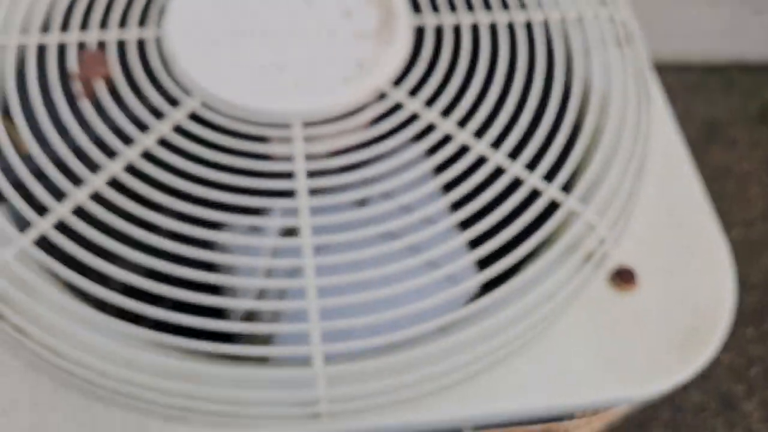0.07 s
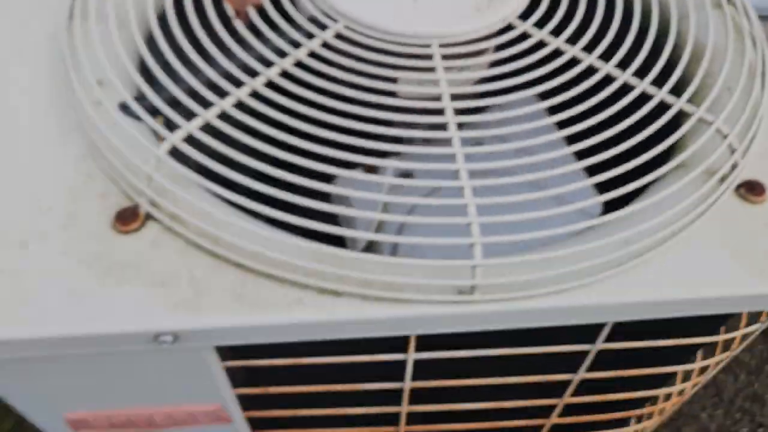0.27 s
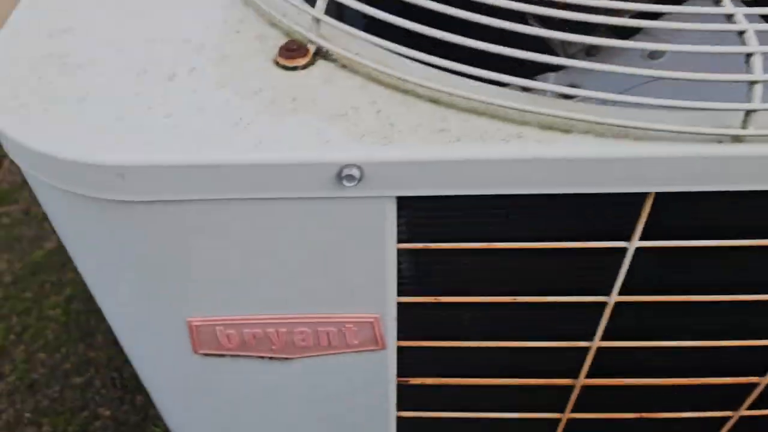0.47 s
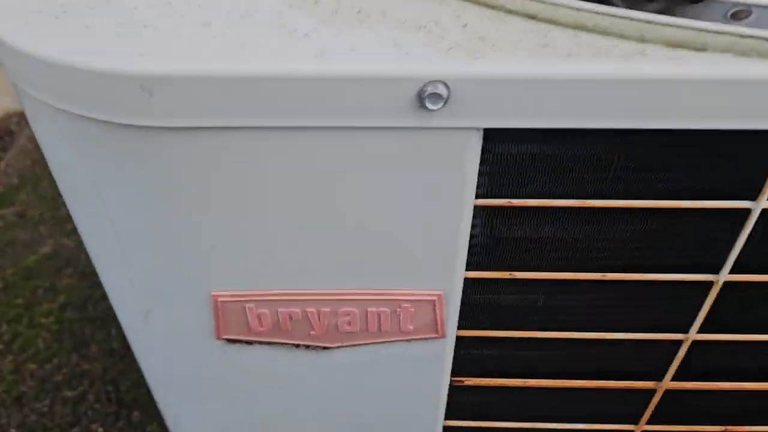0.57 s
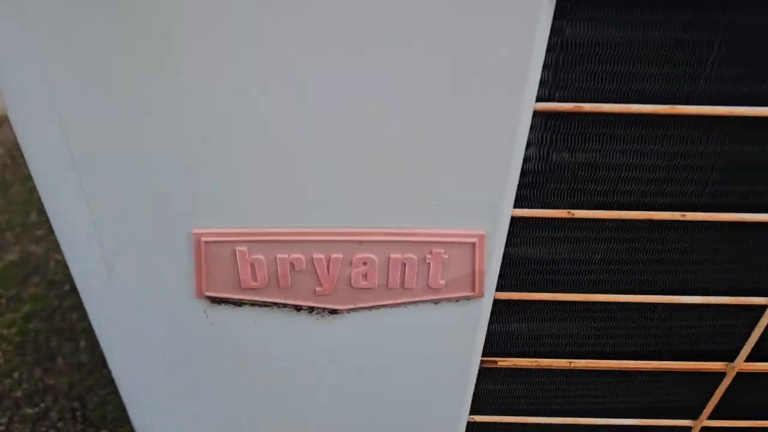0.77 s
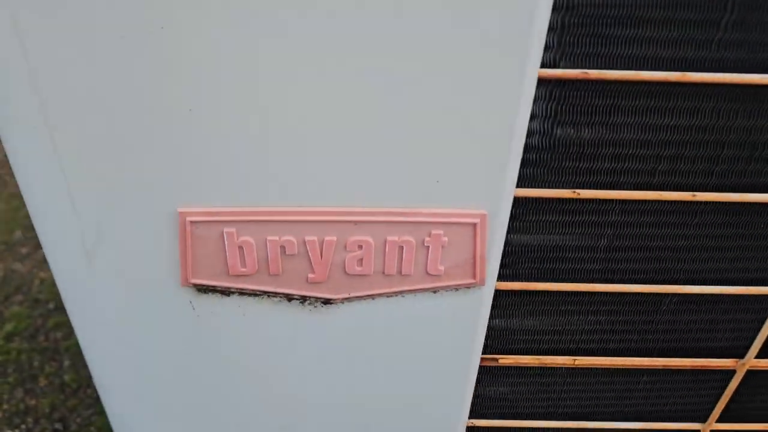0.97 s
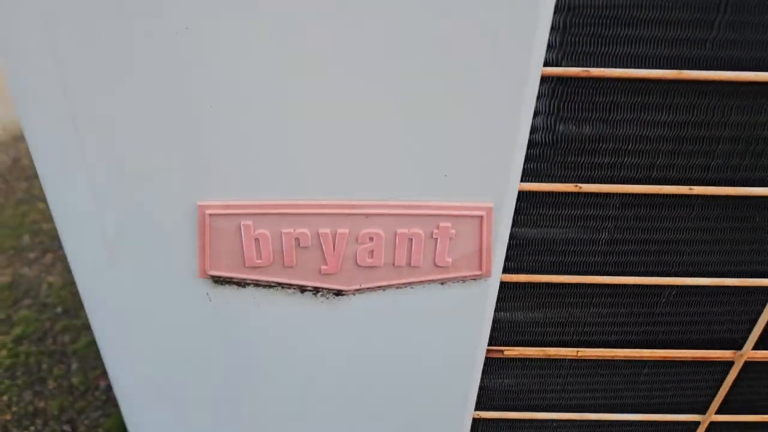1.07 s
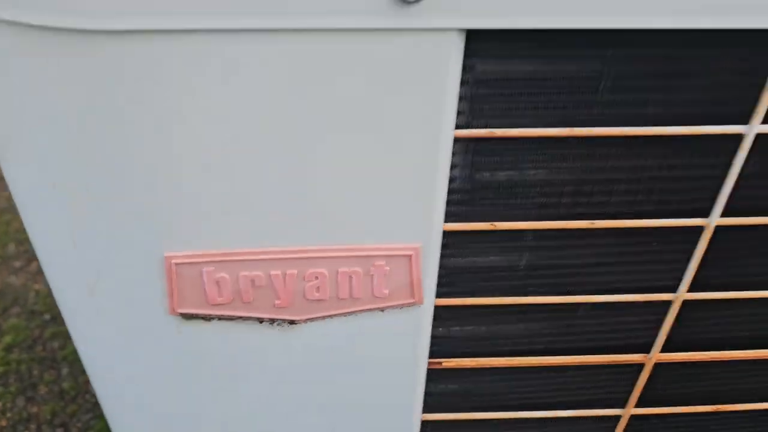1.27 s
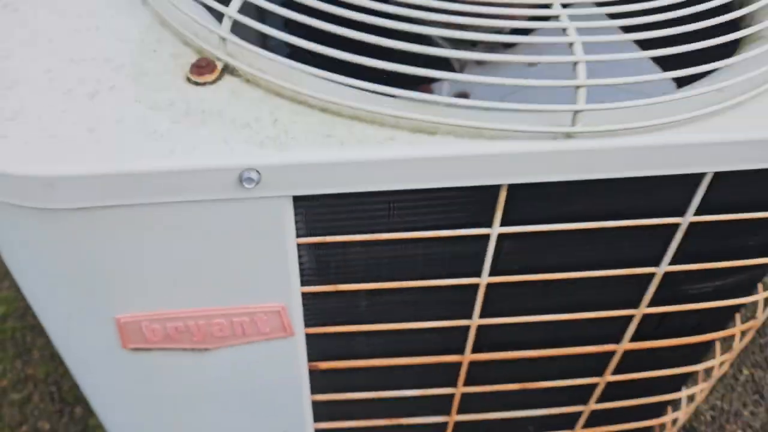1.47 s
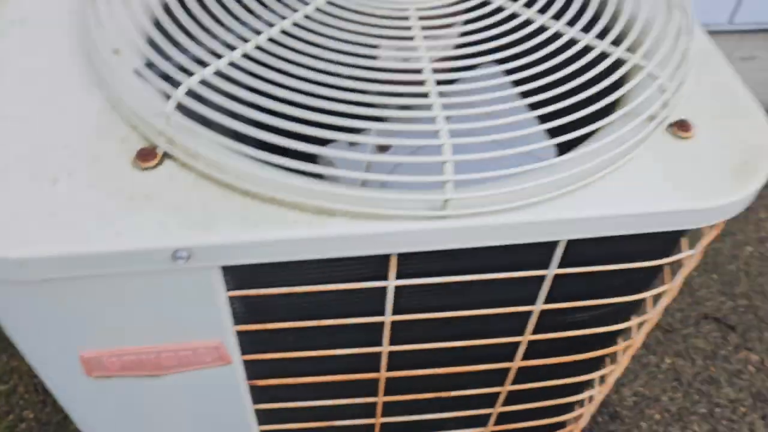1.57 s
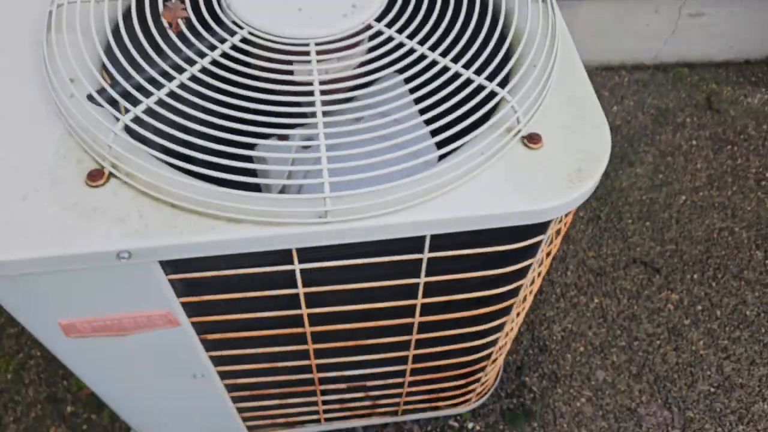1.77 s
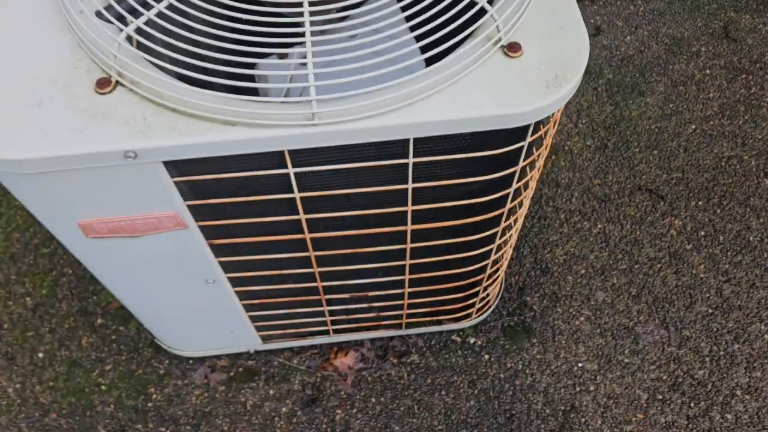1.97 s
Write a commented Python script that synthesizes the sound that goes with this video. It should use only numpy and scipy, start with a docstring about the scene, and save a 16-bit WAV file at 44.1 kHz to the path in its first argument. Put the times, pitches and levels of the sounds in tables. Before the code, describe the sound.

Low, faintly humming rumble of an outdoor cooling unit, with gravel scuffs, a stone knock and cloth rustle.

```python
"""Shuffling on gravel beside an air conditioner

An outdoor unit makes a low, even rumble with a faint hum: filtered noise and wavering sine tones.
Feet shift on gritty gravel: soles scuff (bursts of tiny clicks), stones click and knock (ringing tones).
A sleeve rustles and swishes on the right (filtered noise), and the hand-held microphone takes soft bumps.
"""
import sys
import numpy as np
from scipy import signal
from scipy.fft import rfft, irfft
from scipy.io import wavfile
from scipy.ndimage import uniform_filter1d, map_coordinates

SR = 44100
rng = np.random.default_rng(int(sys.argv[2]) if len(sys.argv) > 2 else 0)


def store_wav(level_fs):
    """Save 16-bit WAV to argv[1]."""
    pcm = np.round(np.clip(np.atleast_2d(level_fs), -1, 1) * 32767)
    wavfile.write(sys.argv[1], SR, pcm.T.astype(np.int16))


N = 88464  # length in samples


def undb(db):
    """Turn decibels into a gain."""
    return 10 ** (np.asarray(db) / 20)


def unit(x):
    """Scale a sound to an average (rms) strength of 1."""
    return x / np.sqrt(np.mean(x ** 2) + 1e-30)


def pan(db):
    """Give the left and right gains for a left-minus-right difference in dB."""
    gains = undb(np.array([[db], [-db]]) / 2)
    return unit(gains)


def frequencies():
    """List the frequency in Hz of each step of a spectrum."""
    return np.arange(N // 2 + 1) * SR / N


def colour(x, points):
    """Filter a sound along a curve of (Hz, dB) points, falling away below the first point."""
    hz, db = np.array(points, float).T
    f = np.maximum(frequencies(), 1)
    gain = undb(np.interp(np.log(f), np.log(hz), db))
    low_cut = np.minimum(f / hz[0], 1) ** 2
    return irfft(rfft(x) * gain * low_cut, N)


def tilted(points, db_per_octave):
    """Make a brighter or duller version of a spectrum."""
    return [(hz, db + db_per_octave * np.log2(hz)) for hz, db in points]


def walk(rate):
    """Wander smoothly at random, with a spread near 1 and `rate` new values per second."""
    hold = int(SR / rate)
    steps = np.repeat(rng.standard_normal(N // hold + 1), hold)
    smooth = uniform_filter1d(uniform_filter1d(steps, hold), hold)
    return unit(smooth[:N])


def since(start):
    """Count the seconds since a moment (negative before it)."""
    return np.arange(N) / SR - start


def swell(peak, attack, release):
    """Rise exponentially to a peak and fall away from it; all times in seconds."""
    t = since(peak)
    return np.exp(np.minimum(t / abs(attack), -t / abs(release)))


def ring(t, t60):
    """Start at t = 0 and die away by 60 dB in t60 seconds."""
    return (t >= 0) * np.exp(-np.log(1000) * np.maximum(t, 0) / t60)


def crackle(rate, spread_db, hiss, shared):
    """Mix dense tiny clicks of uneven strength with hiss, partly shared by both ears."""
    happens = rng.random((3, N)) < rate / SR
    sign = rng.choice([-1, 1], (3, N))
    strength = undb(spread_db * np.minimum(rng.exponential(size=(3, N)), 5))
    x = unit(happens * sign * strength) + hiss * rng.standard_normal((3, N))
    shared = np.clip(shared, 0, 1)
    return np.sqrt(1 - shared) * x[:2] + np.sqrt(shared) * x[2]


def strike(modes, s, db, side, tilt=0):
    """Hit a stone once: its natural tones (modes) start together and each dies away at its own pace."""
    t = since(s)
    body = 0
    for hz, gain_db, t60 in modes:
        tone = np.sin(2 * np.pi * hz * t) * ring(t, t60)
        body = body + tone * undb(gain_db) * undb(tilt * np.log2(hz))
    contact_s = .00025  # softens the very start of the blow
    body = body * (1 - np.exp(-np.maximum(t, 0) / contact_s))
    return body / np.abs(body).max() * undb(db) * pan(side)


def machine():
    """The unit: noise for the rumble, drone and air buffeting the microphone, sine tones for the hum."""
    # Spectra of the noises. Each row: frequency in Hz, relative level in dB.
    rumble_spectrum = [(28, -4), (55, -2), (72, 1), (110, -1.5), (150, -7), (200, -7.5), (245, -12),
                       (290, -11.5), (370, -19.5), (480, -19), (680, -20.5), (950, -26), (1300, -31.5),
                       (3000, -50), (4200, -72), (12000, -100)]
    drone_spectrum = [(120, -23.5), (210, -8), (255, 11.5), (300, -4), (340, 2.5), (420, -7), (590, -5),
                      (760, -23), (1500, -29), (4000, -61), (12000, -90)]
    buffet_spectrum = [(22, -2.5), (45, 3.5), (70, -15.5), (120, -8), (250, -30.5), (600, -72),
                       (3000, -100)]
    # How much the ears differ. Each row: frequency in Hz, side minus mid level in dB.
    ear_difference = [(20, -7), (120, -6), (300, -10), (800, -6), (2500, -2)]
    # The drone swells as the microphone moves. Each row: time in seconds, level in dB.
    drone_level = [(0, -53), (.4, -58.5), (0.702, -55), (1.05, -74), (1.22, -53), (1.36, -56.5),
                   (1.55, -48), (1.7, -55), (2.0, -65)]
    # Deep buffeting on the moving microphone. Each row: time in seconds, level in dB.
    buffet_level = [(0, -58), (.1, -47.5), (.25, -58), (.4, -46), (.52, -45.5), (.68, -48), (.85, -68),
                    (1.25, -66), (1.47, -43), (1.7, -65), (1.95, -47.5)]
    # Wavering tones of the hum. Each row: middle frequency in Hz, middle level in dB.
    hum_tones = [(70, -57), (241, -67.5), (263, -76), (465, -72)]

    def wide(points):
        """Noise with a part common to both ears and a part opposite in each."""
        mid, side = colour(rng.standard_normal((2, N)), points)
        side = colour(side, ear_difference)
        return unit(mid + side * np.array([[1], [-1]]))

    def level(curve):
        """Gain that follows the points of a level curve."""
        return undb(np.interp(since(0), *np.array(curve).T))

    rumble_db, waver_db = -49.5, 2
    rumble = wide(rumble_spectrum) * undb(rumble_db + waver_db * walk(5.62))

    left, right = wide(drone_spectrum) * level(drone_level)
    lag_s = 0.00043  # the drone reaches the right ear first
    drone = np.array([np.roll(left, int(lag_s * SR)), right])

    buffet = wide(buffet_spectrum) * level(buffet_level)

    pitch_waver, flutter_db = .015, 2  # pitch as a fraction of the frequency
    hum = 0
    for hz, db in hum_tones:
        gain = undb(db + flutter_db * walk(5.8))
        cycles = np.cumsum(hz * (1 + pitch_waver * walk(12))) / SR + rng.random()
        hum = hum + gain * unit(np.sin(2 * np.pi * cycles))
    return (rumble + drone + buffet + hum) * pan(-0.6)


def air():
    """Faint outdoor hiss: random noise with a shaped spectrum."""
    # Spectrum of the hiss. Each row: frequency in Hz, relative level in dB.
    air_spectrum = [(1500, 37), (3000, 19.5), (6000, 22), (9000, 11.5), (11000, -48), (16000, -48)]
    hiss = unit(colour(rng.standard_normal((2, N)), air_spectrum))
    return hiss * undb(-77) * pan(db=-8)


def swish():
    """Thin, whistling fabric: bands of friction noise waver and creep upward as it slides faster."""
    # Resonances of the fabric. Each row: frequency in Hz, width in Hz, relative level in dB.
    swish_modes = [(2300, 900, -9), (3256, 430, 0), (4680, 380, -11.5), (6950, 3300, -31)]
    peak_s, attack_s, release_s, level_db = .23, .35, 0.078, -55.5
    f = frequencies()
    bands = sum(undb(db) / (1 + ((f - hz) / width * 2) ** 2) for hz, width, db in swish_modes)
    rub = irfft(rfft(rng.standard_normal((2, N))) * bands, N)
    # Playing the noise faster or slower moves its pitch.
    rise_per_s, waver = .2, .02  # fractions of the normal speed
    speed = 1 + rise_per_s * since(peak_s) + waver * walk(30)
    place = np.cumsum(speed)
    rub = unit(np.array([map_coordinates(ear, [place], mode="wrap") for ear in rub]))
    return rub * swell(peak_s, attack_s, release_s) * undb(level_db) * pan(-9.5)


def sleeve():
    """Cloth slides near the right ear: crackling fibres, with a different colour for each move."""
    # Moves of the sleeve. Each row: peak in seconds, level in dB, attack in seconds,
    # release in seconds, brightness in dB per octave, frequency of an emphasis in Hz.
    rustles = [(0.02, -61.5, 0.048, 0.047, 9, 5300), (.235, -69.5, 0.045, .03, 3, 6970),
               (.64, -69, 0.12, 0.13, 5, 1570), (0.85, -66, 0.07, 0.058, 1, 5500),
               (1.158, -71.5, 0.027, 0.022, -4, 5840), (1.32, -55, 0.0056, 0.022, 4.5, 4440),
               (1.353, -64, 0.017, 0.0086, 4, 3450), (1.455, -67.5, 0.01, 0.043, 0, 5300),
               (1.559, -64, 0.026, 0.019, 3, 5350), (1.741, -75.5, 0.15, 0.029, 5, 7160),
               (1.879, -69, 0.042, 0.07, 2, 4800)]
    # Spectrum of the cloth before tilting. Each row: frequency in Hz, relative level in dB.
    cloth = [(600, -14.5), (1500, 7), (3200, 6.5), (4500, -2), (6000, -2), (8800, -8), (10300, -25.5),
             (12500, -7.5), (16000, -19)]
    emphasis_db, emphasis_octaves = 8, 0.13
    fibres = rfft(crackle(rate=3500, spread_db=-2.5, hiss=0.32, shared=0.13))
    f = np.maximum(frequencies(), 1)
    out = 0
    for s, db, attack, release, tilt, hz in rustles:
        octaves_away = np.log2(f / hz)
        emphasis = undb(emphasis_db * np.exp(-.5 * (octaves_away / emphasis_octaves) ** 2))
        rustle = unit(colour(irfft(fibres * emphasis, N), tilted(cloth, tilt)))
        out = out + rustle * undb(db) * swell(s, attack, release)
    return out * pan(-12)


def pebbles():
    """Each pebble gives a snap and a few milliseconds of crumbling around its own pitch."""
    # Single clicks. Each row: start in seconds, peak level in dB before panning, centre in Hz,
    # width in octaves, left minus right in dB.
    clicks = [(0.1023, -47.5, 5240, 0.56, -10), (0.3772, -41.5, 2490, 0.61, 4),
              (.457, -48.5, 13100, 0.32, -12), (.5625, -43.5, 7000, 3.6, -12), (.6779, -40, 2470, 0.23, 0),
              (.7375, -41, 4660, 0.48, -5), (0.7439, -34, 5600, 0.85, 11), (.7675, -55, 6500, 0.97, -10),
              (.801, -46.5, 6200, 0.42, 5), (1.16, -59.5, 5270, 0.24, -8), (1.729, -53, 7150, 1.8, -11),
              (1.7586, -47.5, 6600, 0.28, -2), (1.7816, -54, 2830, 0.11, -9)]
    snap_size, crumble_size, crumble_t60_s = .3, .1, .012  # sizes count relative to each other
    f = np.maximum(frequencies(), 1)
    out = 0
    for s, db, hz, octaves, side in clicks:
        click = crumble_size * rng.standard_normal((2, N)) * ring(since(s), crumble_t60_s)
        click[:, int(s * SR)] += snap_size
        band = np.exp(-.5 * (np.log2(f / hz) / octaves) ** 2)
        click = irfft(rfft(click) * band, N)
        out = out + click / np.abs(click).max() * undb(db) * pan(side)
    return out


def scuffs():
    """Grit crunches in fits and starts (stick and slip) from the moment the sole touches it."""
    # Scuffs of the sole. Each row: touch in seconds, level in dB, rise in seconds,
    # release in seconds, brightness in dB per octave, left minus right in dB.
    touches = [(0.2415, -51, 0.0024, 0.13, 3, 1), (0.276, -45, 0.019, 0.022, 6, -1),
               (0.287, -52.5, 0.026, 0.055, 1.5, -2), (0.386, -60.5, 0.055, 0.079, 1, -18),
               (.56, -69.5, .06, 0.081, -6, -13), (0.693, -53, 0.011, 0.037, 0, -6.5),
               (.742, -54.5, 0.013, 0.022, 3.5, -3.5), (1.34, -73, 0.05, 0.069, 9.5, -3),
               (1.72, -65.5, 0.056, 0.038, 0, -8)]
    # Spectrum of the grit before tilting. Each row: frequency in Hz, relative level in dB.
    grit = [(500, 8), (1200, 12), (2500, 7), (4500, 3), (6500, -1), (8200, 0), (10500, -13), (13000, -2.5),
            (16000, -23.5)]
    stick_slip_db, stick_slip_per_s = 2, 170
    out = 0
    for s, db, rise, release, tilt, side in touches:
        grains = crackle(rate=3500, spread_db=4.5, hiss=0.59, shared=0.16)
        grains = grains * undb(stick_slip_db * walk(stick_slip_per_s))
        press = np.clip(since(s) / rise, 0, 1)
        let_go = np.exp(-np.maximum(since(s + rise), 0) / release)
        crunch = unit(colour(grains, tilted(grit, tilt)))
        out = out + crunch * undb(db) * press * let_go * pan(side)
    return out


def scrape():
    """One stone scrapes and rings: crackling friction excites its high resonances."""
    # Resonances of the stone. Each row: frequency in Hz, width in Hz, relative level in dB.
    scrape_modes = [(7950, 120, -26.5), (8140, 260, 4), (8950, 200, 8), (11230, 420, -4), (13000, 510, -5),
                    (14300, 1100, -19.5)]
    peak_s, attack_s, release_s, level_db = 0.2897, 0.0056, 0.012, -36
    f = frequencies()
    stone = sum(undb(db) / (1 + 2j * (f - hz) / width) for hz, width, db in scrape_modes)
    friction = crackle(rate=5800, spread_db=2.5, hiss=.6, shared=0.098)
    rub = unit(irfft(rfft(friction) * stone, N))
    return rub * swell(peak_s, attack_s, release_s) * undb(level_db) * pan(9)


def bumps():
    """The hand jolts the microphone: one deep swing down and back up."""
    # Soft bumps. Each row: middle in seconds, peak level in dB before panning, speed of the swing in Hz.
    jolts = [(.346, -35, 44.6), (0.465, -34, 56), (0.566, -30.5, 86), (1.319, -36.5, 85),
             (1.444, -35.5, 62), (1.563, -33, 44.5), (1.662, -39, 61), (1.904, -38, 69)]
    out = 0
    for s, db, hz in jolts:
        u = 2 * np.pi * hz * since(s)
        out = out + undb(db) * u * np.exp(.5 - .5 * u ** 2)
    return out * pan(db=1.5)


def knocks():
    """Stones knock and rattle, followed by scattered reflections from the wall and cabinet."""
    # Dull knocks under the sole. Each row: start in seconds, peak level in dB before panning
    # and reflections, left minus right in dB.
    blows = [(0.4931, -18.5, -3.5), (.4948, -35, -12.5)]
    # Another stone rattles. Each row: the same three columns, then brightness in dB per octave.
    clacks = [(0.6782, -45, 1, 5.5), (.7148, -31, -4.5, 0.5), (.7171, -38.5, 1, -3), (.7222, -46, -15, 1),
              (.7302, -41.5, -10, 4.5), (0.7309, -36.5, 2, -6.5), (1.3206, -45.5, -15, 3),
              (1.7582, -46.5, -15, 4), (1.7793, -52, -13, 4), (1.9021, -48.5, -2, -4)]
    # Tones of the two stones. Each row: frequency in Hz, relative level in dB,
    # time to die away by 60 dB in seconds.
    knock_modes = [(430, -22.5, 0.052), (498, -8, 0.061), (625, 1.5, 0.015), (860, 9, 0.012),
                   (920, -9, 0.0065), (1370, 0, 0.007), (1850, -3, 0.01), (2080, -3.5, 0.013),
                   (2550, -8, 0.013), (4900, -12.5, 0.0095), (5300, -15, 0.0083)]
    clack_modes = [(443, -4.5, 0.017), (618, 6.5, 0.013), (1042, -1, 0.027), (1462, 0.5, 0.011),
                   (2164, -2, 0.009), (2390, -4.5, 0.0082), (2900, -28, .013), (5150, -16, 0.009)]
    # Spectrum of the reflections. Each row: frequency in Hz, relative level in dB.
    tail_colour = [(200, -10), (900, -5), (1800, -6), (6000, -6.5)]
    tail_db, tail_t60_s = -6.5, 0.059
    direct = sum(strike(knock_modes, *row) for row in blows)
    direct = direct + sum(strike(clack_modes, *row) for row in clacks)
    # Fading noise stands for many small echoes.
    echoes = colour(rng.standard_normal((2, N)), tail_colour) * ring(since(0), tail_t60_s)
    echoes = unit(echoes) / np.sqrt(N)
    tail = signal.fftconvolve(direct, echoes, axes=1)[:, :N]
    return direct + undb(tail_db) * tail


def footfall():
    """A shoe lands with a quiet thud: mostly low crackle that starts fast and dies away."""
    # Spectrum of the thud. Each row: frequency in Hz, relative level in dB.
    thud_spectrum = [(80, 6), (130, 1), (280, 3), (500, -8), (800, -21), (1400, -21.5), (3000, -22),
                     (6000, -39), (14000, -65)]
    start_s, attack_s, t60_s, level_db = 1.3185, .0015, .12, -43
    grains = crackle(rate=1100, spread_db=4, hiss=0.56, shared=0.95)
    thud = unit(colour(grains, thud_spectrum))
    t = since(start_s)
    return thud * np.clip(t / attack_s, 0, 1) * ring(t, t60_s) * undb(level_db) * pan(-9)


def draught():
    """The fan's turbulent air flutters, swells and fades as the microphone passes over the grille."""
    # Spectrum of the draught. Each row: frequency in Hz, relative level in dB.
    draught_spectrum = [(250, 0.5), (340, 0), (480, 0), (620, -8.5), (800, -27.5), (2000, -48.5),
                        (8000, -69)]
    peak_s, attack_s, release_s, level_db = 1.562, .1, 0.066, -49.5
    flutter_db, flutter_per_s = 3.5, 60
    flutter = undb(flutter_db * walk(flutter_per_s))
    gusts = unit(colour(rng.standard_normal(N), draught_spectrum) * flutter)
    return gusts * swell(peak_s, attack_s, release_s) * undb(level_db)


def scene():
    """Add up the unit, the air and the person moving beside it."""
    surroundings = machine() + air() + draught()
    cloth_and_hand = swish() + sleeve() + bumps()
    feet = pebbles() + scuffs() + scrape() + knocks() + footfall()
    return surroundings + cloth_and_hand + feet


def record(dry):
    """The recorder cuts the top: a steep filter removes what lies above 15900 Hz."""
    low_pass = signal.ellip(10, .2, 70, 15900, fs=SR, output="sos")
    return signal.sosfilt(low_pass, dry)


dry = scene()
out = record(dry)
store_wav(out)
```